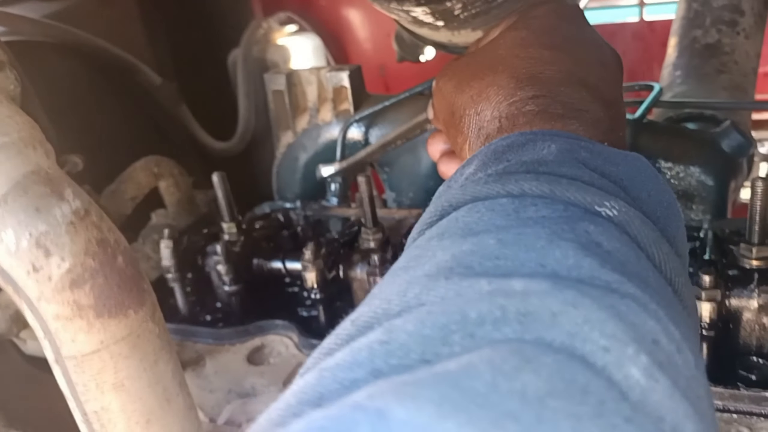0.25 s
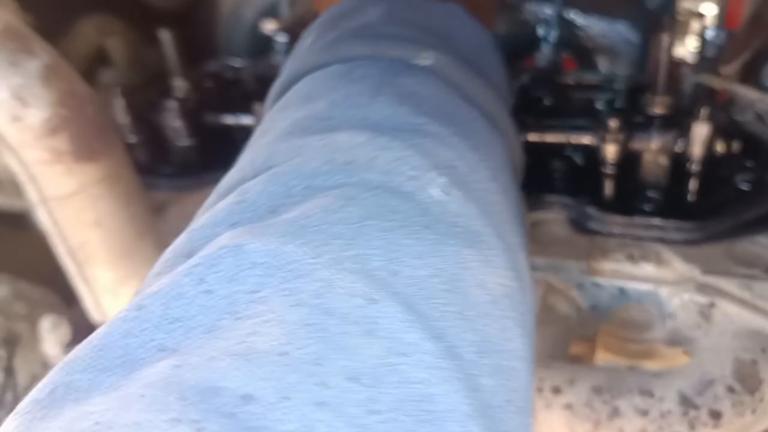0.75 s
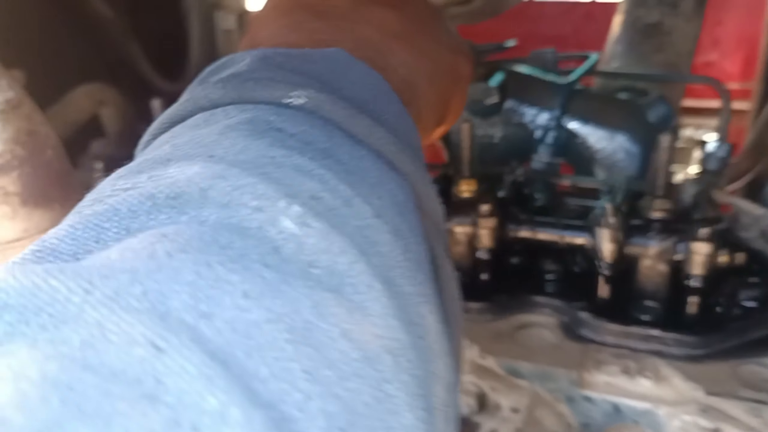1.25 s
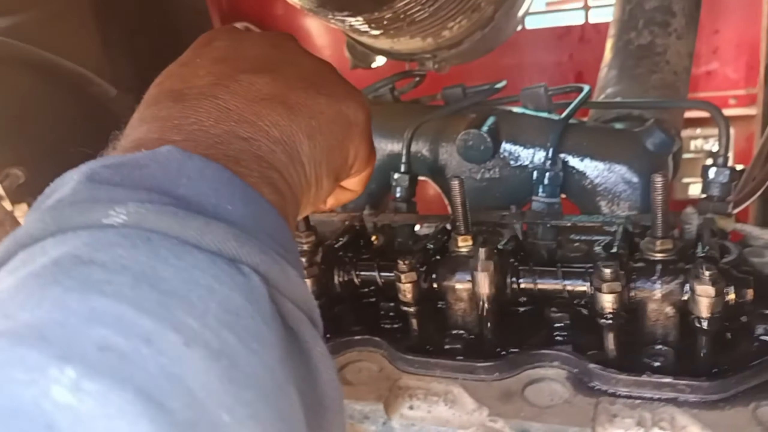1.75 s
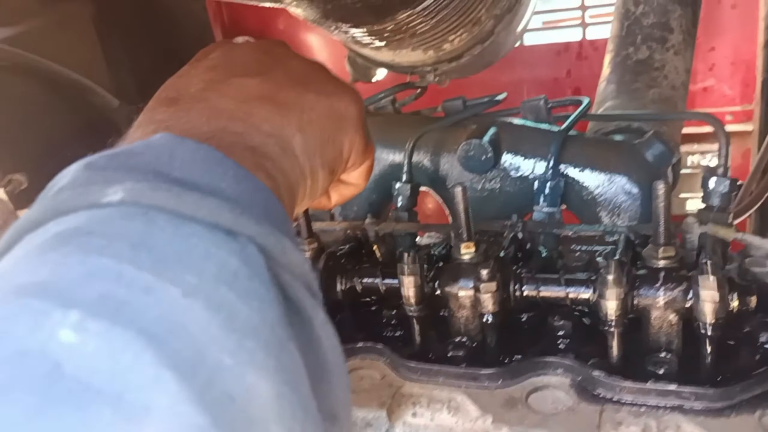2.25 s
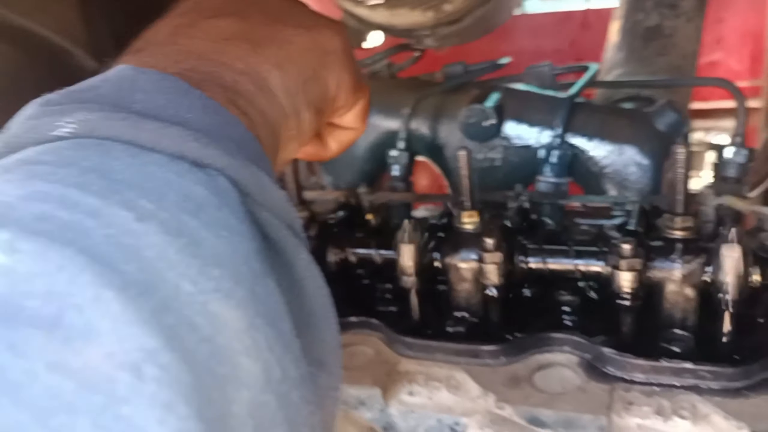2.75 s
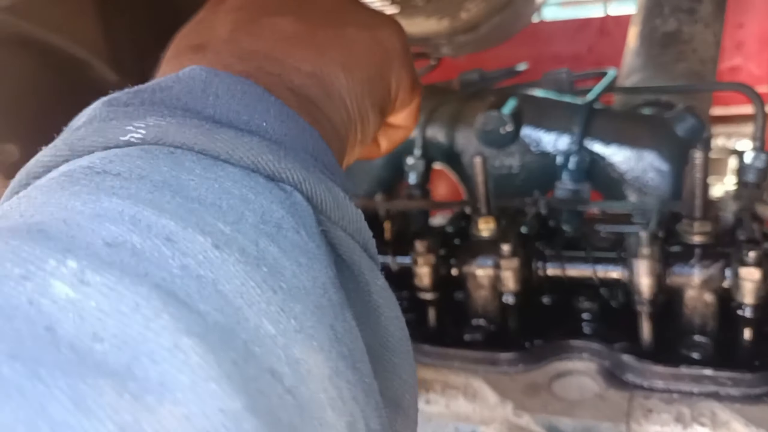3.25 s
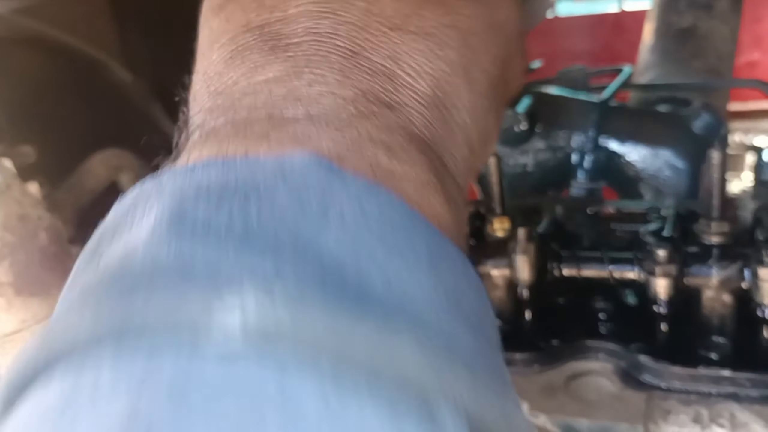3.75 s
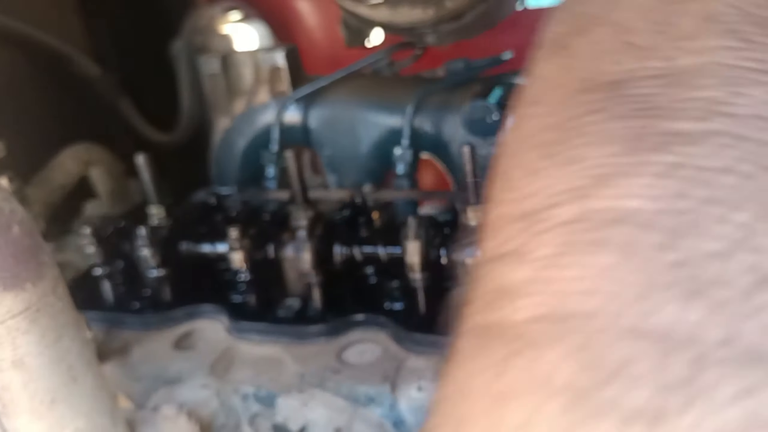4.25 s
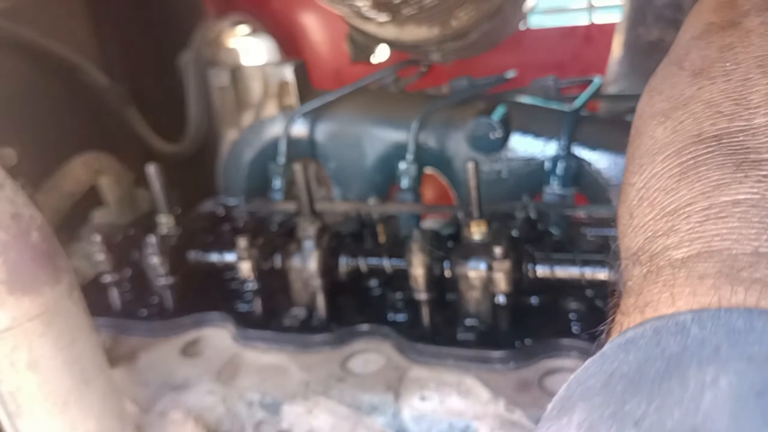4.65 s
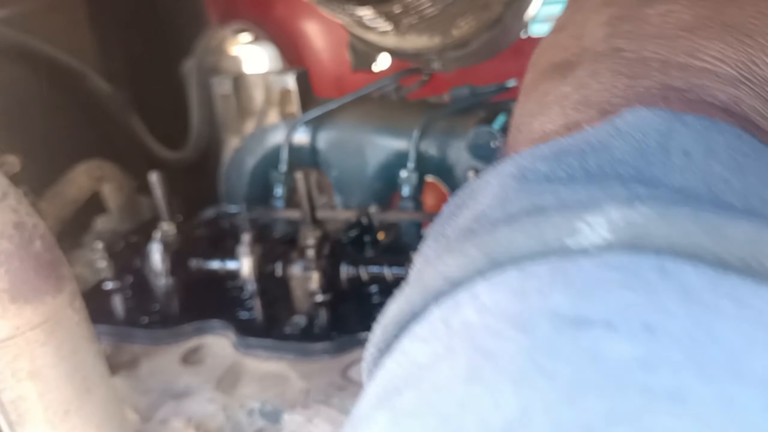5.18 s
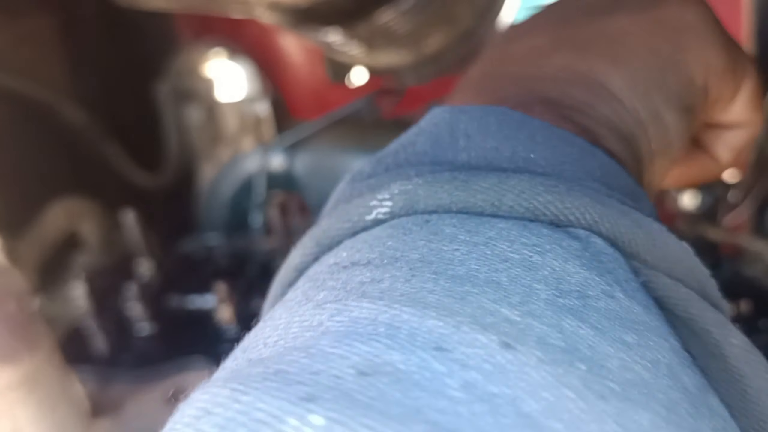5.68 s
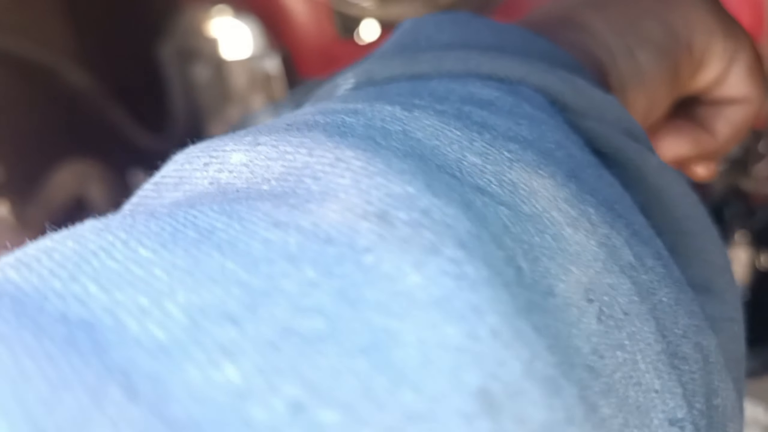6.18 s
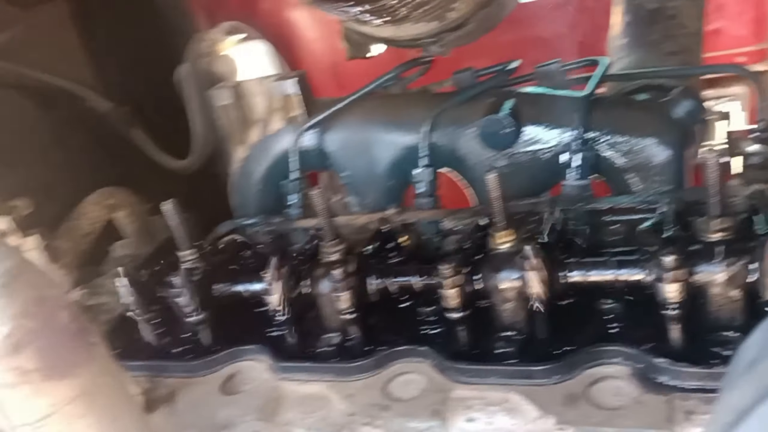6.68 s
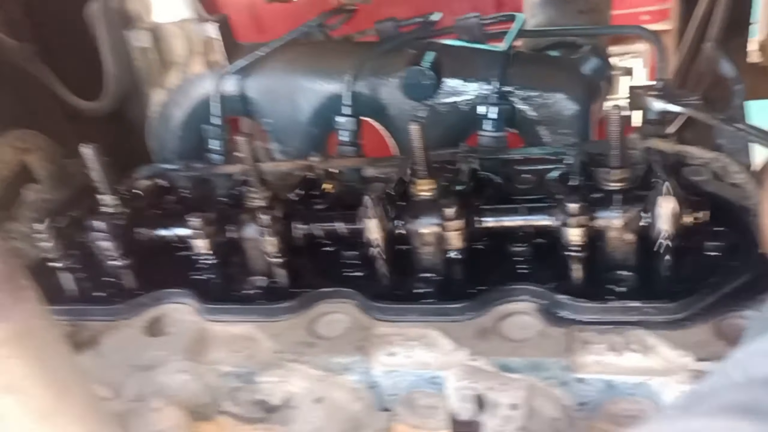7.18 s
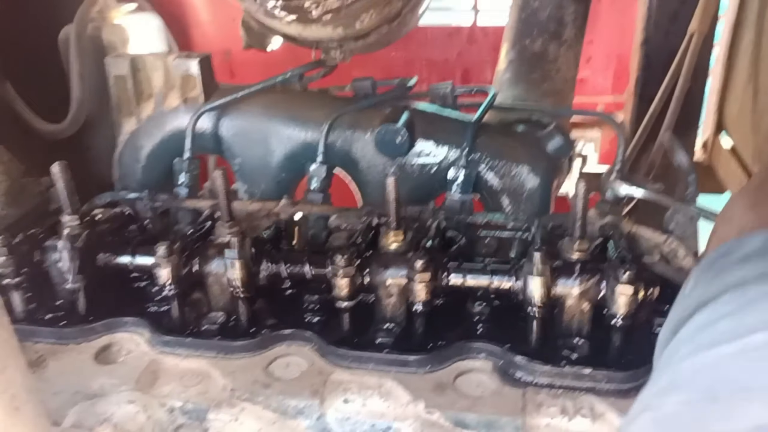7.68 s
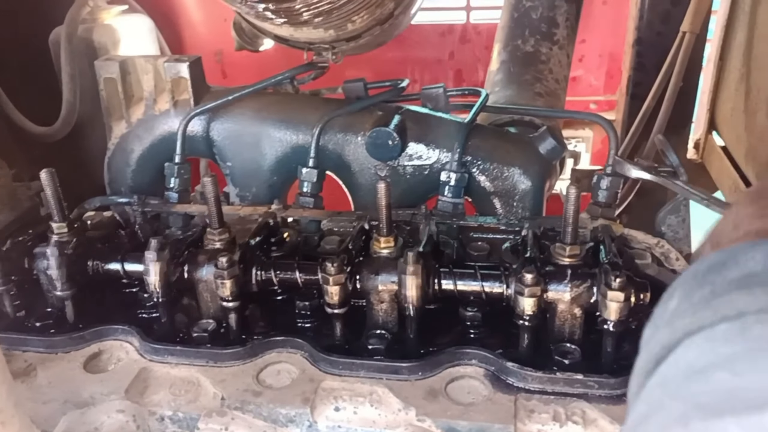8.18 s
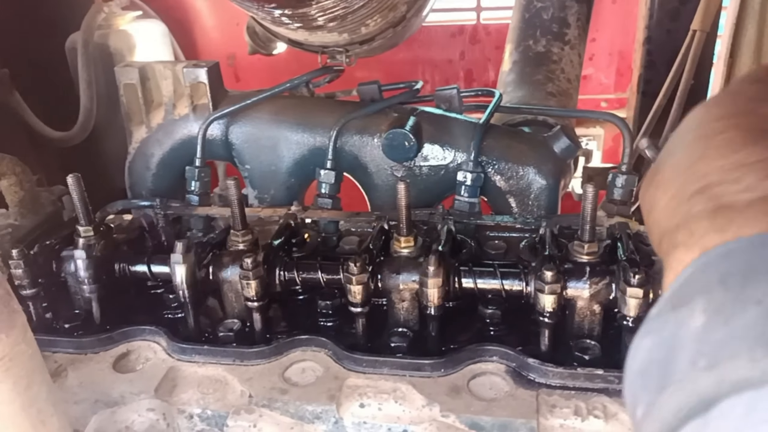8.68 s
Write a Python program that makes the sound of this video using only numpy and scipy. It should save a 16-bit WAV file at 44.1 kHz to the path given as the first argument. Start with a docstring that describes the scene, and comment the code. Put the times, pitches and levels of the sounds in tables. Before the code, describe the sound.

A four-cylinder diesel engine idles close by, thumping steadily under the metallic clatter and ticking of its exposed valve gear.

```python
"""A four-cylinder diesel thumps and clatters steadily, close by, with its valve gear open.
Each firing rings the block and manifold over the low crank tones. Valve and injector contacts knock
in the head and set off bursts of metal ticks; one tappet pings. The fan hums and rushes.
Two moving microphone ports colour the sound, which drops out for half a second."""
import sys
import numpy as np
from scipy import signal
from scipy.fft import rfft, irfft
from scipy.io import wavfile
from scipy.ndimage import uniform_filter1d

SR = 44100
rng = np.random.default_rng(int(sys.argv[2]) if len(sys.argv) > 2 else 0)


def store_wav(level_fs):
    """Save 16-bit WAV to argv[1]."""
    pcm = np.round(np.clip(np.atleast_2d(level_fs), -1, 1) * 32767)
    wavfile.write(sys.argv[1], SR, pcm.T.astype(np.int16))


N = 393813

DROPOUT_START_S, DROPOUT_END_S = 6.4215, 6.968
# valve and injector contacts: place/cycle, relative knock/dB, relative clatter/dB, clatter t60/s
CONTACTS = [(0.101, -17.5, -1.5, .04), (0.154, -7, 1, .025), (.362, 1.5, 1, .033), (0.392, -7.5, 0, .07),
            (0.413, -5, 2, .04), (.505, -7.5, -23, .03), (0.573, -4.5, -16.5, .03), (0.594, -9.5, -1, .04),
            (.635, 0.5, -0.5, .04), (.665, -11, -2.5, 0.076), (0.849, -17.5, -3.5, .034),
            (.895, -18, -2, 0.044)]


def from_db(db):
    return 10 ** (np.asarray(db) / 20)


def unit_rms(x):
    return x / np.sqrt(np.mean(x ** 2) + 1e-20)


def over_time(rows):
    """Columns of a (t/s, ...) table at every sample."""
    times_s, *columns = np.transpose(rows)
    return [np.interp(np.arange(N) / SR, times_s, column) for column in columns]


def over_hz(points):
    """A (f/Hz, value) table at every spectral bin."""
    hz, values = np.transpose(points)
    bins_hz = np.arange(1, N // 2 + 2) * SR / N
    return np.interp(np.log(bins_hz), np.log(hz), values)


def coloured(x, spectrum):
    return irfft(rfft(x) * from_db(over_hz(spectrum)), N)


def drift(corner_hz):
    """Low-passed noise, unit rms."""
    hop = 40
    r = np.exp(-2 * np.pi * corner_hz * hop / SR)
    slow = signal.lfilter([1], [1, -2 * r, r * r], rng.standard_normal(N // hop + 2002))[2000:]
    return np.interp(np.arange(N) / hop, np.arange(len(slow)), unit_rms(slow))


def ring(clicks, hz, t60_s):
    """One mode: a unit click starts a decaying unit sine."""
    r, w = from_db(-60 / (t60_s * SR)), 2 * np.pi * hz / SR
    return signal.lfilter([0, np.sin(w)], [1, -2 * r * np.cos(w), r * r], clicks + 1e-18)


def stereo_noise():
    """White noise at two ports, alike in the bass, nearly unrelated at the top."""
    # port coherence: f/Hz, common share of power
    coherence = [(100, 1), (300, 0.66), (700, 0.36), (1500, 0.32), (4000, 0.4), (9000, 0.076)]
    common, left, right = rfft(rng.standard_normal((3, N)))
    share = np.clip(over_hz(coherence), 0, 1)
    return irfft(np.sqrt(share) * common + np.sqrt(1 - share) * np.array([left, right]), N)


def once_a_cycle(cycle, place, spread_db, spread_s):
    """A click each time the cycle passes a place, uneven in strength and time."""
    passes = np.arange(np.ceil(cycle[0] - place), cycle[-1] - place) + place
    jitter, strength = np.clip(rng.standard_normal((len(passes), 2)), -2, 2).T
    at = np.searchsorted(cycle, passes) + (spread_s * SR * jitter).astype(int)
    clicks = np.zeros(N)
    clicks[np.clip(at, 0, N - 1)] = from_db(spread_db * strength)
    return clicks


def engine_cycle():
    """Four-stroke cycles run so far, two crank turns each; the phase jumps inside the dropout."""
    # speeds the governor settles on: from t/s, crank speed/rpm
    speeds = [(0, 1492.6), (.88, 1505.6), (2.4, 1504.15), (6.7, 1501), (7.4, 1485), (7.88, 1499)]
    settle_s, start_cycles, jump_cycles = .1, .106, .58
    t = np.arange(N) / SR
    from_s, step_rpm = np.transpose(speeds)
    rpm = step_rpm[np.searchsorted(from_s, t, "right") - 1]
    rpm = uniform_filter1d(rpm, size=int(settle_s * SR), mode="nearest")
    jump = jump_cycles * (t > (DROPOUT_START_S + DROPOUT_END_S) / 2)
    return start_cycles + jump + np.cumsum(rpm / 120) / SR


def firing_thumps(cycle):
    """Each cylinder pushes each block mode by where it sits on the mode's shape."""
    # firings of cylinders 1-4: place/cycle
    firings = (.104, .362, .570, .834)
    # block and manifold modes: f/Hz, t60/s, signed push from cylinders 1-4
    block_modes = [(204.8, .101, .084, -.122, -.26, .247), (236.7, .029, .875, .686, .897, -.911),
                   (293.6, .033, -.79, -.294, -.347, .37), (345.2, .056, .157, .025, .051, -.095),
                   (408, .12, -.07, -.08, -.06, -.06), (426, .2, -.03, .03, -.03, .03)]
    blows = np.array([once_a_cycle(cycle, place, spread_db=.7, spread_s=.00022) for place in firings])
    return sum(ring(np.dot(push, blows), hz, t60_s) for hz, t60_s, *push in block_modes)


def crank_tones(cycle):
    """Firing orders dip together; unevenness between cylinders fills the orders between."""
    # engine orders: f/cycle rate, level/dB
    orders = [(4, -15), (7, -43), (8, -23), (9, -28.5), (11, -55), (12, -23)]
    dip_lead_cycles = .045   # ahead of each quarter cycle
    out = 0
    for order, db in orders:
        start_turns = order * dip_lead_cycles + .5 if order % 4 == 0 else rng.random()
        amplitude = np.sqrt(2) * from_db(db + drift(1.3))
        out += amplitude * np.cos(2 * np.pi * (order * cycle + start_turns))
    return out


def valve_clatter(cycle):
    """Each contact frees a dying swarm of metal ticks, which keep the rockers ringing."""
    # tick spectrum: f/Hz, relative density/dB
    tick_spectrum = [(300, -3), (900, -13), (2000, 0), (3000, -8.5), (4000, -7.5), (6000, -3.5),
                     (9000, -8.5), (13000, -9), (16000, -12.5)]
    # rocker modes: f/Hz, gain/dB, t60/s
    rocker_modes = [(4020, -36, 0.035), (5386, -37.5, 0.019)]
    power = 0
    for place, _, db, t60_s in CONTACTS:
        clicks = once_a_cycle(cycle, place, spread_db=1.5, spread_s=.00027)
        power_decay = from_db(-120 / (t60_s * SR))
        power += from_db(2 * db) * signal.lfilter([1], [1, -power_decay], clicks + 1e-18)
    power = uniform_filter1d(power, size=40) + from_db(-55.5)   # the gear never falls silent
    grain = from_db(2 * np.clip(drift(250), -2, 2))
    ticks = coloured(np.sqrt(power) * grain * stereo_noise(), tick_spectrum)
    rockers = sum(from_db(db) * ring(ticks, hz, t60_s) for hz, db, t60_s in rocker_modes)
    return unit_rms(ticks + rockers)


def head_knock(cycle):
    """Contacts push each head mode one way or the other; the ports hear the modes unequally."""
    # head and rocker modes: f/Hz, relative level/dB, t60/s, left minus right/dB
    head_modes = [(566, 6.5, 0.036, 7), (767, -5.5, 0.037, -8), (1170, -11.5, 0.04, -1.5),
                  (1432, 11, 0.028, -11.5), (1592, 6, 0.058, -1), (2038, 4, .04, 7), (2460, 3, 0.038, 0)]
    blows = [from_db(db) * once_a_cycle(cycle, place, spread_db=2.5, spread_s=.00015)
             for place, db, *_ in CONTACTS]
    out = np.zeros((2, N))
    for hz, db, t60_s, pan_db in head_modes:
        push = rng.choice([-1, 1], len(blows)) * from_db(rng.normal(0, 2, len(blows)))
        out += from_db([[db + pan_db / 2], [db - pan_db / 2]]) * ring(push @ blows, hz, t60_s)
    return unit_rms(out)


def tappet_ping(cycle):
    """One tappet rings once a cycle."""
    taps = once_a_cycle(cycle, place=.4, spread_db=1, spread_s=.0005)
    return ring(taps, hz=4057, t60_s=.02)


def fan(cycle):
    """Wavering tones on a lumpy rush of air; the belt slips a little."""
    # belt-driven fan tones: f/cycle rate, level/dB
    tones = [(6.01, -27), (17.64, -21.5), (35.28, -40)]
    # fan and intake rush: f/Hz, relative density/dB
    rush_spectrum = [(20, -43), (70, -16), (125, -9), (170, 5), (230, 0), (310, -8), (450, -7), (800, -15),
                     (950, -20), (1400, -14.5), (2500, -21.5), (3200, -25), (6000, -29), (16000, -37.5)]
    belt_cycle = cycle + np.cumsum(.014 * drift(.68)) / SR
    hum = sum(np.sqrt(2) * from_db(db + 1.9 * drift(3)) * np.sin(2 * np.pi * order * belt_cycle)
              for order, db in tones)
    rush_db = -17.5 + .68 * drift(27)
    return hum + from_db(rush_db) * unit_rms(coloured(stereo_noise(), rush_spectrum))


def scene():
    """One engine cycle drives all sources; the valve gear's balance shifts as the ports move."""
    # valve gear at the ports: t/s, knock/dB, clatter/dB, ping/dB, left minus right/dB
    gear_gains = [(0, -27.5, -26, -23.5, 1), (2, -30, -25, -23.5, 0.5), (3.2, -30, -24, -22.5, -1.5),
                  (5, -26.5, -24.5, -24.5, 1.5), (6.4, -28, -26, -24.5, 0.5), (7, -31.5, -24, -18.5, 3.5),
                  (8.93, -32.5, -23.5, -20.5, 4)]
    knock_db, clatter_db, ping_db, pan_db = over_time(gear_gains)
    cycle = engine_cycle()
    ping = from_db(ping_db) * tappet_ping(cycle)
    knock = from_db(knock_db) * head_knock(cycle)
    clatter = from_db(clatter_db) * valve_clatter(cycle)
    valve_gear = (knock + clatter + ping) * from_db([pan_db / 2, -pan_db / 2])
    return crank_tones(cycle) + firing_thumps(cycle) + fan(cycle) + valve_gear


def record(dry):
    """Two ports add colour and phase; the band is limited, peaks are rounded, a stretch drops out."""
    # left port response: f/Hz, gain/dB
    left_port = [(50, -2), (300, 2.5), (1200, 6.5), (1900, -0.5), (4300, -2.5), (5600, -8), (6800, -22),
                 (7700, -5.5), (9450, 3.5), (11400, -8), (12700, -4), (14000, -12), (15500, -30.5)]
    # right port response: f/Hz, gain/dB
    right_port = [(50, -4.5), (300, 1.54), (1200, 6), (1900, 4.5), (3200, 0), (4500, 2), (5400, 3.5),
                  (7000, -0.5), (8000, -9), (9200, -20.5), (10100, -63.5), (10900, -32.5), (12200, -7.5),
                  (14000, -5.5), (15500, 2)]
    # housing's phase shift at the left port: f/Hz, phase/rad
    housing_phase = [(0, 0), (800, -2), (2000, -1), (3800, -1), (4300, .2), (5600, .5), (6800, 2.8)]
    left_lead_s = .0005   # the left port is nearer
    low_cut_hz, high_cut_hz = 33, 15900
    left, right = rfft(dry)
    hz = np.arange(len(left)) * SR / N
    lead_rad = 2 * np.pi * hz * left_lead_s + np.interp(hz, *np.transpose(housing_phase))
    left *= from_db(over_hz(left_port)) * np.exp(1j * lead_rad)
    right *= from_db(over_hz(right_port))
    ports = irfft([left, right], N)
    ports = signal.sosfilt(signal.butter(4, low_cut_hz, "high", fs=SR, output="sos"), ports)
    ports = 1.246 * np.tanh(ports / 1.309)
    t = np.arange(N) / SR
    ports *= (t < DROPOUT_START_S) | (t > DROPOUT_END_S)
    return signal.sosfilt(signal.cheby2(16, 70, high_cut_hz, fs=SR, output="sos"), ports)


dry = scene()
out = record(dry)
store_wav(out)
```